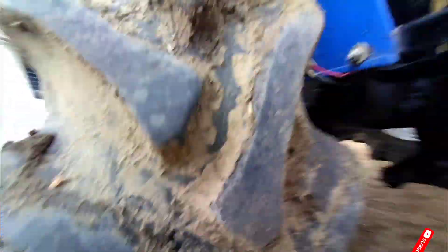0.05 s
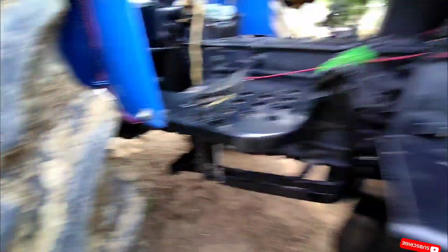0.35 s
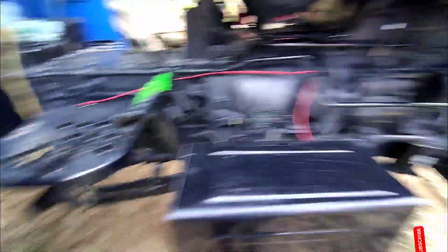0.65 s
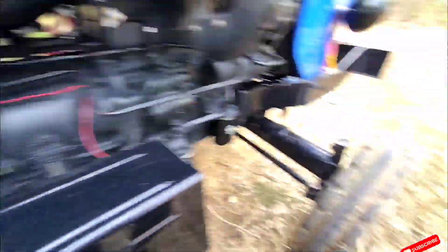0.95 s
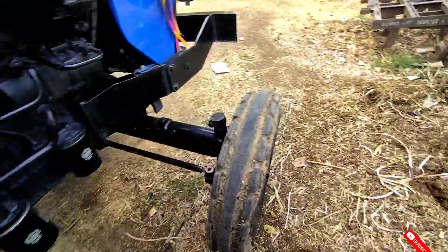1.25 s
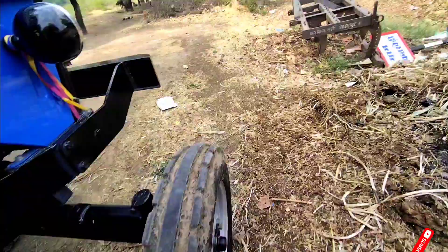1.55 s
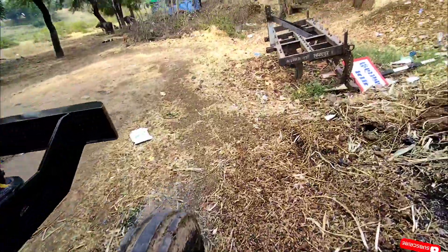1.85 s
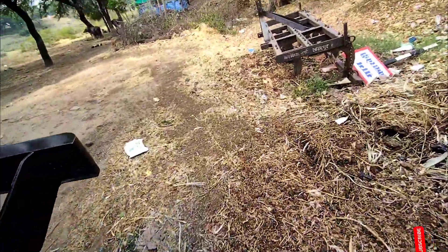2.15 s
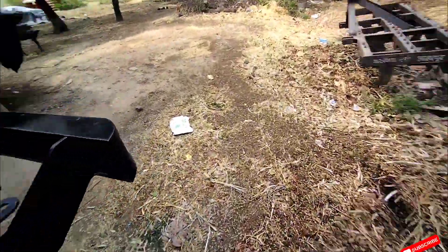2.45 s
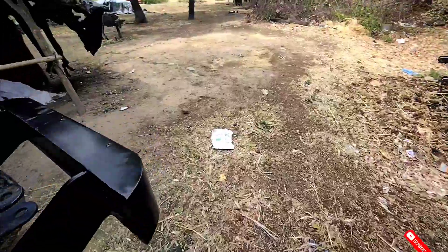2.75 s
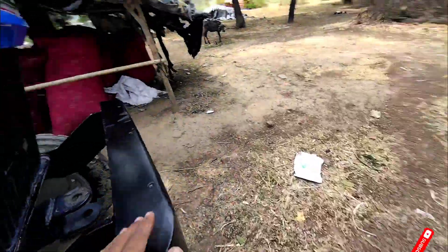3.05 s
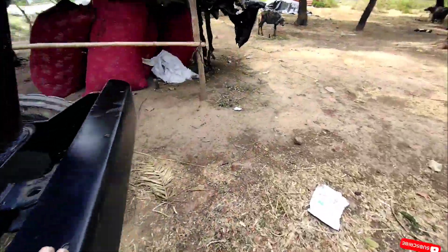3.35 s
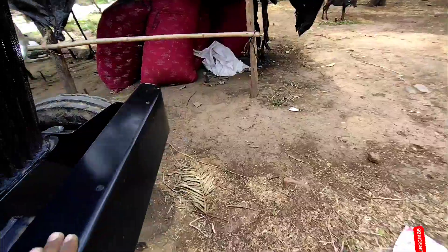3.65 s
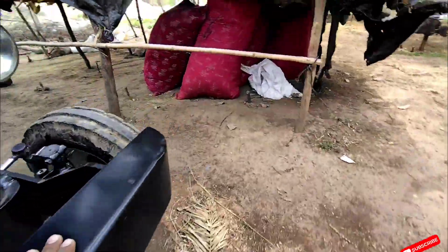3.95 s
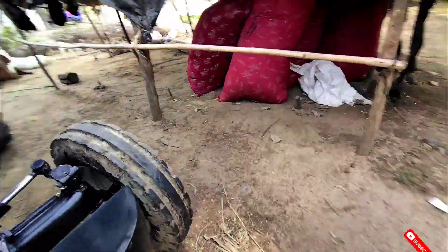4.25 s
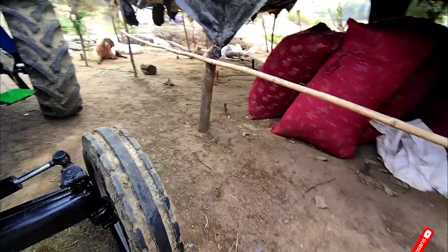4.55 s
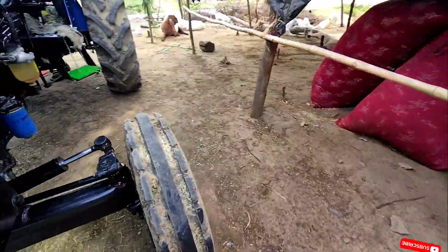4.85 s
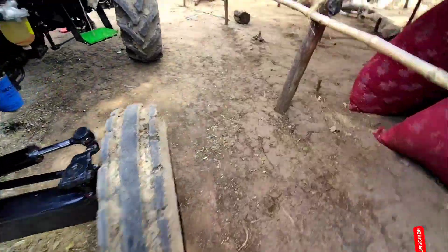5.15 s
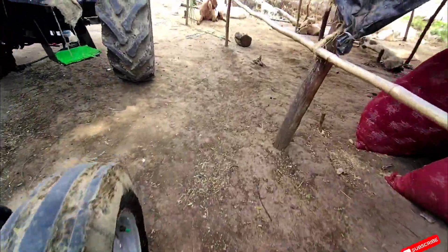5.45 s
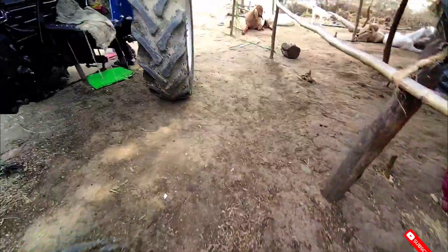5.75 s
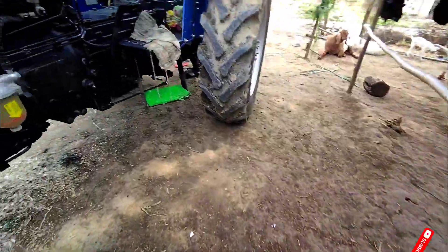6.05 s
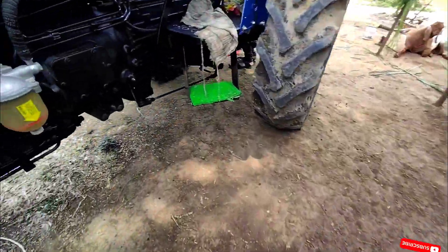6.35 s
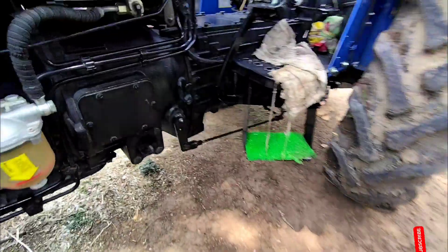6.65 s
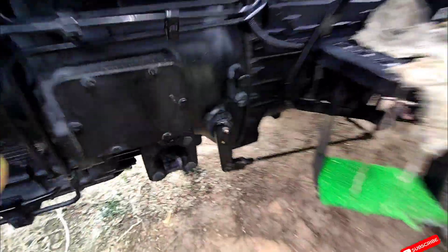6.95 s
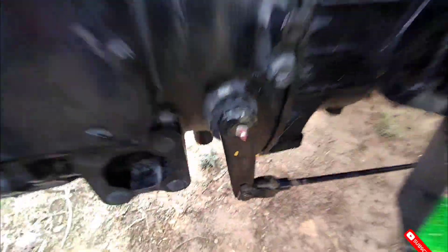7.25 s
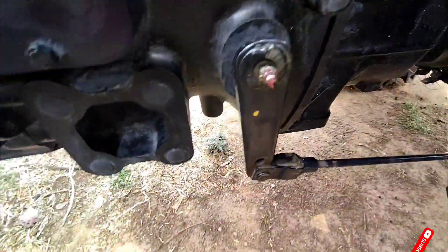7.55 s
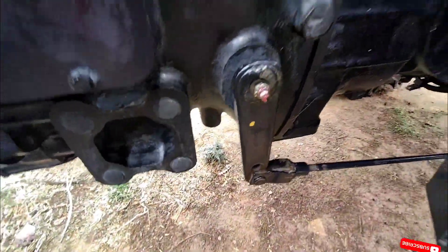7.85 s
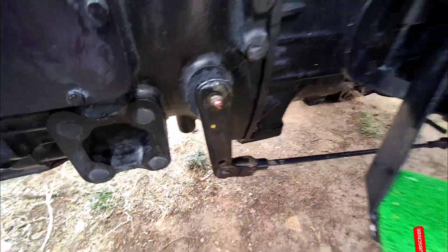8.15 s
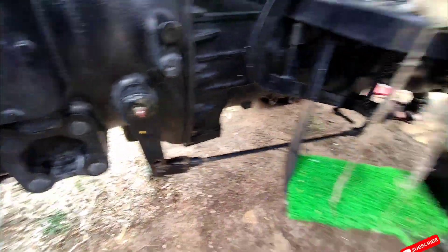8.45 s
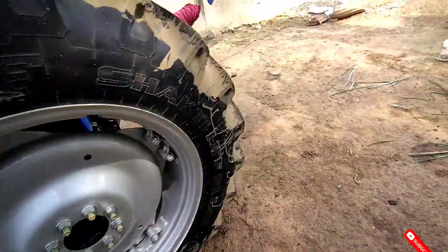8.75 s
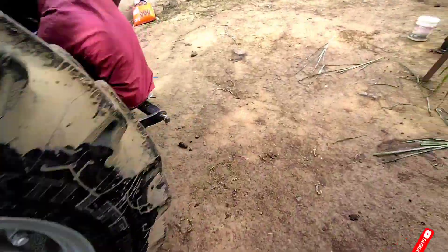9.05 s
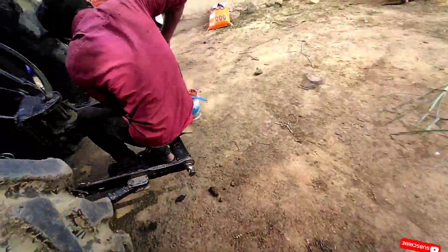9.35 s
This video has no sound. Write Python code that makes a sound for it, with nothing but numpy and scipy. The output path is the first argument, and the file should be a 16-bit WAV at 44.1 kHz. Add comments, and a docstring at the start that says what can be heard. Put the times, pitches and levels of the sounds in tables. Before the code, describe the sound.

A hand-lever grease gun clacks under a tractor, speeding up and growing louder, then pausing before four more strokes, over faint outdoor rumble.

```python
"""In a farmyard, a hand-lever grease gun is pumped under a tractor: slowly, then about five strokes a
second, then four more after a pause. Each stroke scrapes, clacks against its stop, rings the lever and
spring, and sets the chassis booming; the loose linkage rattles in between. The listener walks round the
tractor and ever closer, over a faint outdoor rumble and hum, a few birds, scuffs, bumps and ticks."""
import sys
import numpy as np
from scipy import signal
from scipy.fft import rfft, irfft
from scipy.io import wavfile
from scipy.ndimage import uniform_filter1d

SR = 44100
rng = np.random.default_rng(int(sys.argv[2]) if len(sys.argv) > 2 else 0)


def int16_out(signal):
    """Quantize to a 16-bit WAV file."""
    q = np.round(np.clip(np.atleast_2d(signal).T, -1, 1) * 32767)
    wavfile.write(sys.argv[1], SR, q.astype(np.int16))


N = 415414
SIZE, LEAD = 24576, 4096  # samples in one blow, and how many come before it lands
T = (np.arange(SIZE) - LEAD) / SR  # seconds from the landing
AFTER = np.maximum(T, 0)
HZ = np.fft.rfftfreq(SIZE, 1 / SR)

# Lever strokes; a harder hit has more treble: start_s, level_db, hardness_db
LEVER_STROKES = [(0.2567, -35.5, 7), (0.68, -36, -0.5), (1.121, -34, 7), (1.5457, -36.5, -4.5),
                 (1.9947, -39, -5), (2.389, -40, -6.5), (2.7643, -39.5, -7), (3.077, -37.5, -1),
                 (3.3566, -38, 2.5), (3.6216, -38.5, 1.5), (3.8805, -38, -3), (4.112, -38, -1),
                 (4.3544, -34, -1), (4.558, -33.5, 4.5), (4.7566, -32.5, 1.5), (4.942, -31, 2.5),
                 (5.1276, -30, 2.5), (5.319, -30, 2), (5.489, -31, 1.5), (5.701, -28.5, 0.5),
                 (5.8779, -28, 1), (6.076, -27, 1), (6.266, -25, 0.5), (6.459, -23.5, -.5),
                 (6.648, -24, -3.5), (6.8424, -21, -1), (7.9036, -22.5, -4), (8.189, -23.5, -0.5),
                 (8.445, -20.5, -1.5), (8.688, -19, -2)]
# The gun as heard along the walk: time_s, left_delay_samples, left_over_right_db, boom_db, knock_db
WALK_PATH = [(0.25, -14, 0, -3, -9.5), (1.12, -12, -1, -7.5, -11), (1.55, -11.5, -.5, -3.5, 2),
             (2.5, -13.5, -1.5, 0.5, -1), (3.2, -16, 0, 4.5, 7.5), (4.1, -15, -1, 9, 4.5),
             (4.5, -15, -0.5, 3, 2.5), (5.6, -13, -1, -1, 0.5), (6.25, -2, -1.5, -2, -7),
             (6.8, 3, -1, -2.5, -5.5), (8.7, 5, -2.5, -7.5, -5)]
# How alike left and right are for close sounds: pitch_hz, likeness (0 to 1)
NEAR_LIKENESS = [(100, 1), (300, 0.8), (700, 0.78), (2000, 0.14), (5000, 0.099), (14000, 0.14)]
# The same for sounds from all around: pitch_hz, likeness (0 to 1)
YARD_LIKENESS = [(40, 0.41), (85, 1), (160, 0.84), (500, 0.7), (1500, 0.068), (12000, 0.079)]


def amp(db):
    """Turns decibels into a gain."""
    return 10 ** (np.asarray(db) / 20)


def read(points, hz):
    """Reads a curve of (pitch, value) points, joined by straight lines on a log pitch scale."""
    pitches, values = np.transpose(points)
    return np.interp(np.log(hz + 1), np.log(pitches + 1), values)


def along(curve, s):
    """Reads each column of a curve at time s."""
    times, *columns = np.transpose(curve)
    return [np.interp(s, times, column) for column in columns]


def add(mix, s, sound):
    """Lays a sound into the mix from time s."""
    part = mix[:, max(round(s * SR), 0):][:, :sound.shape[-1]]
    part += sound[..., :part.shape[1]]


def evened(x):
    """Scales a sound to an average (rms) level of 1."""
    return x / np.sqrt(np.mean(x ** 2) + 1e-20)


def unit_blow(x):
    """Scales a blow to the energy of 30 ms at level 1."""
    return evened(x) * np.sqrt(.03 * SR / SIZE)


def jitter(count, smooth_samples):
    """A quick random wobble, made of smoothed noise."""
    return evened(uniform_filter1d(rng.standard_normal(count), smooth_samples))


def drift(points):
    """A slow random wander through this many points over the whole scene."""
    return np.interp(np.arange(N), np.linspace(0, N - 1, points), rng.standard_normal(points))


def noise_pair(likeness, hz):
    """Spectra of two partly alike white noises, left and right."""
    left, other = np.exp(2j * np.pi * rng.random((2, len(hz))))
    same = np.clip(read(likeness, hz), -1, 1)
    return np.array([left, same * left + np.sqrt(1 - same ** 2) * other])


def causal(db):
    """A filter with these gains that rings only after a blow, never before it."""
    log_gain = db * np.log(10) / 20
    mirrored = np.r_[log_gain, log_gain[-2:0:-1]]
    return np.exp(np.conj(signal.hilbert(mirrored))[:len(db)])


def outdoor_air(trims_db=(2.0, -3.5, -1.0), flutter_db=4.0):
    """Three bands of noise, each gently uneven: muffled rumble, open air and fine hiss."""
    # Band levels before their trims: time_s, rumble_db, air_db, hiss_db
    band_levels = [(0.3, -60, -50, -56), (2.1, -63, -56.5, -64), (3.8, -63, -53, -56.5),
                   (4.8, -64, -49.5, -56.5), (5.7, -58, -56, -58.5), (6.4, -56.5, -53, -73),
                   (7.1, -57.5, -49.5, -65.5), (7.72, -56, -56, -71), (8.7, -50, -46, -74.5)]
    # Tone colour of the air: pitch_hz, level_db
    air_colour = [(15, -60.5), (25, -21.5), (170, 1), (242, -8), (354, -10), (439, -11), (503, -13.5),
                  (659, -15.5), (887, -16), (962, -18.5), (2480, -17), (3340, -21), (4370, -21.5),
                  (7510, -29), (16000, -23)]
    hz, t = np.fft.rfftfreq(N, 1 / SR), np.arange(N) / SR
    noise = noise_pair(YARD_LIKENESS, hz) * amp(read(air_colour, hz))
    low, high = read([(350, 0.63), (550, 0)], hz), read([(5000, 0.059), (7000, 0.88)], hz)
    out = np.zeros((2, N))
    for band, level, trim in zip([low, 1 - low - high, high], along(band_levels, t), trims_db):
        out += evened(irfft(noise * band, N)) * amp(level + trim + flutter_db * drift(300))
    return out


def hum(waver=0.16):
    """Faint steady tones that waver in level."""
    # Tones of the hum: pitch_hz, level_db
    tones = [(177.6, -76), (586.8, -71), (656.8, -71)]
    t = np.arange(N) / SR
    out = np.zeros(N)
    for hz, db in tones:
        tone = np.sqrt(2) * np.sin(2 * np.pi * (hz * t + rng.random()))
        out += amp(db) * tone * (1 + waver * drift(40))
    return out


def birds(wobble=0.034):
    """Distant birds whistle short, unsteady notes that slide up or down."""
    # Bird notes: start_s, length_s, start_hz, end_hz, level_db
    notes = [(2.104, 0.078, 3000, 3700, -60), (3.286, 0.053, 2700, 3320, -54),
             (4.226, 0.06, 2750, 3350, -53.5), (5.004, 0.072, 4700, 4220, -45),
             (5.057, 0.039, 3780, 4240, -44), (7.597, 0.11, 1190, 1156, -53.5)]
    out = np.zeros((2, N))
    for s, length, start_hz, end_hz, db in notes:
        count = int(length * SR)
        pitch = np.linspace(start_hz, end_hz, count) * (1 + wobble * jitter(count, 60))
        add(out, s, amp(db) * np.hanning(count) * np.sin(2 * np.pi * np.cumsum(pitch) / SR))
    return out


def scuffs(grit=0.31):
    """Short rubs: grainy noise swells and fades."""
    # Scuffs: peak_s, level_db, half_length_s, treble_db
    rubs = [(0.197, -41.5, 0.046, 10), (0.938, -53, 0.037, 8), (2.311, -54, 0.051, 0),
            (2.698, -53, .04, -16), (4.29, -50, 0.028, 6), (5.859, -41, .009, 10), (6.191, -45, 0.0081, 6),
            (6.79, -38.5, 0.0085, 3.5), (7.33, -54, 0.28, -4), (7.538, -40.5, 0.051, -9.5)]
    out = np.zeros((2, N))
    for s, db, half, treble in rubs:
        colour = read([(200, -22), (900, -5.5), (1500, 2), (3000, 0),
                       (6000, treble - 11), (15000, treble - 17)], HZ)
        grains = np.exp(grit * jitter(SIZE, 80))
        rub = evened(irfft(noise_pair(YARD_LIKENESS, HZ) * amp(colour)) * grains)
        swell = np.exp(-(T / half) ** 2) * signal.windows.tukey(SIZE, .1)
        add(out, s + T[0], amp(db) * swell * rub)
    return out


def bumps():
    """Dull bumps, each a few cycles of a low tone."""
    # Bumps: peak_s, pitch_hz, level_db, half_length_s
    thuds = [(0.233, 103, -27, 0.01), (1.975, 403, -33, 0.0045), (2.719, 410, -30.5, 0.0028),
             (1.904, 470, -38, 0.0066), (2.65, 490, -41.5, 0.012), (7.332, 233, -38, 0.0042)]
    out = np.zeros((2, N))
    for s, hz, db, half in thuds:
        add(out, s + T[0], amp(db) * np.exp(-(T / half) ** 2) * np.sin(2 * np.pi * hz * T))
    return out


def ticks(fall_s=0.0016):
    """Tiny bright snaps of noise close by, with no ring."""
    # Dry ticks: start_s, level_db
    snaps = [(2.539, -38), (2.672, -37), (2.841, -34.5), (2.907, -38.5)]
    colour = read([(300, -17), (1500, 12.5), (6000, -8), (13000, 4.5)], HZ)
    out = np.zeros((2, N))
    for s, db in snaps:
        fizz = evened(irfft(noise_pair(NEAR_LIKENESS, HZ) * amp(colour)))
        add(out, s + T[0], amp(db) * fizz * (T > 0) * np.exp(-AFTER / fall_s))
    return out


def yard_tail(level_db, rise_s=0.0045):
    """The yard's reflections blur into noise that dies away after a blow."""
    # How long each band takes to fade by 60 dB: pitch_hz, fade_s
    yard_fades = [(150, 0.77), (600, 0.49), (1500, 0.22), (3500, .25), (12000, 0.34)]
    centres, fades = np.transpose(yard_fades)
    noise = noise_pair(YARD_LIKENESS, HZ)
    tail = np.zeros((2, SIZE))
    for share, fade_s in zip(np.eye(len(centres)), fades):
        band = irfft(noise * read(np.c_[centres, share], HZ))
        tail += amp(level_db - 60 * AFTER / fade_s) * band
    return tail * (1 - np.exp(-AFTER / rise_s))


def place(sound, s):
    """The gun reaches left and right with a delay and balance that follow the walk."""
    # Colour difference between the sides: pitch_hz, left_over_right_db
    side_colour = [(100, 2), (500, 0.5), (1200, 0.5), (2500, -4.5), (5000, -3.5), (8000, 0.5), (13000, 4.5)]
    lag, pan_db, _, _ = along(WALK_PATH, s)
    left = amp((pan_db + read(side_colour, HZ)) / 2) * np.exp(-1j * np.pi * HZ * lag / SR)
    return irfft(rfft(sound) * np.array([left, 1 / left]))


def ring(tones, rise_s, detune, spread_db=2.5):
    """Struck metal rings a little differently each time; each tone drops 60 dB in its fade_s."""
    hz, db, fade_s = np.transpose(tones)[:, :, None]
    cycles = hz * (1 + detune * rng.standard_normal(hz.shape)) * AFTER + rng.random(hz.shape)
    db = db + spread_db * rng.standard_normal(hz.shape)
    waves = amp(db - 60 * AFTER / fade_s) * np.sin(2 * np.pi * cycles)
    return waves.sum(0) * (1 - np.exp(-AFTER / rise_s))


def spring():
    """The return spring sings with a few high tones."""
    # Tones of the spring: pitch_hz, level_db, fade_s
    tones = [(3436, 3, 0.34), (2230, -10, 0.45), (2560, -5.5, 0.26), (4830, -13.5, 0.22)]
    return unit_blow(ring(tones, rise_s=0.011, detune=0.0023))


def chassis_boom(swell_gain=0.77, swell_s=0.033, width_s=0.023):
    """The chassis booms, swelling as the sound comes back from under the tractor."""
    # Low tones of the chassis: pitch_hz, level_db, fade_s
    tones = [(154, -28, .25), (176, -9.5, 0.53), (224.7, 1, 0.45), (245.5, 0, 0.27), (290, -14.5, 0.6)]
    swell = 1 + swell_gain * np.exp(-((T - swell_s) / width_s) ** 2)
    return unit_blow(ring(tones, rise_s=0.017, detune=0.02) * swell)


def chassis_knock():
    """The chassis answers a blow at once with a hollow knock."""
    # Middle tones of the chassis: pitch_hz, level_db, fade_s
    tones = [(457.6, -11.5, .17), (574, -3.5, 0.26), (603, -3, 0.36), (641, -1, 0.28), (725, -4.5, 0.2)]
    return unit_blow(ring(tones, rise_s=0.0017, detune=0.0178))


def lever_clang():
    """The steel lever rings briefly."""
    # Tones of the lever: pitch_hz, level_db, fade_s
    tones = [(919.6, -6, .11), (1108, -4.5, 0.076), (1353, 0.5, 0.16), (1709, 2.5, 0.089),
             (2240, -5.5, 0.1), (2605, -1.5, .13), (2823, -0.5, 0.053), (3100, -3.5, 0.043),
             (5246, -3, .08)]
    return unit_blow(ring(tones, rise_s=0.00081, detune=.012, spread_db=4.5))


def clack(gun_noise, colour_db, attack_s, fall_s, scrape_db, tail_db, dip=0, alike=0.27, echo_s=.044):
    """Steel meets steel: a scrape, a burst and an echo of noise, coloured by the gun's barrel."""
    # Resonances of the barrel and lever: pitch_hz, width_hz, lift_db
    resonances = [(466, 7.3, 6), (627, 160, 3), (814, 32, 6), (924, 84, 4), (1142, 27, 4), (1242, 68, 7),
                  (1396, 67, 3.5), (1703, 76, 4.5), (2142, 88, 4), (2510, 170, 5.5), (2830, 160, 3),
                  (3345, 560, 0.5), (3880, 120, 2.5), (4644, 130, 6.5), (5226, 220, 2), (6030, 160, 1),
                  (10000, 720, 1.5), (13050, 810, 5)]
    # Tone colour common to all clacks: pitch_hz, level_db
    base_colour = [(40, -35.5), (95, -18), (165, 0), (260, 0.5), (350, -3), (700, -1.5), (1400, -6.5),
                   (2600, -4), (4000, -10.5), (5800, -12), (7500, -22), (11000, -24), (16000, -29.5)]
    noise = irfft(np.sqrt(alike) * gun_noise + np.sqrt(1 - alike) * noise_pair(NEAR_LIKENESS, HZ))
    chatter = np.exp(0.2 * np.tanh(jitter(SIZE, 70)))
    slips = np.exp(0.57 * jitter(SIZE, 200))
    onset = .5 + .5 * np.tanh(T / attack_s)
    onset *= 1 - dip * np.exp(-AFTER / 0.0015)  # holds back the first instant
    burst = onset * chatter * np.exp(-(np.maximum(T - attack_s, 0) / fall_s) ** 0.86)
    scrape = amp(scrape_db) * slips * np.exp(-abs(T) / 0.021)
    echo = amp(-20) * slips * (T > echo_s) * np.exp(-abs(T - echo_s) / fall_s)
    sound = noise * np.sqrt(burst ** 2 + scrape ** 2 + echo ** 2) + yard_tail(tail_db)
    barrel_db = sum(db / (1 + (2 * (HZ - hz) / width) ** 2) for hz, width, db in resonances)
    sound = unit_blow(irfft(rfft(sound) * causal(read(base_colour, HZ) + barrel_db)))
    return irfft(rfft(sound) * causal(colour_db))


def linkage_rattles(gun_noise, trim_db=-3, take_up_treble_db=-12.5):
    """Slack in the linkage closes with a light clack before each stroke, and now and then between."""
    # How the slack changes over time: time_s, lead_s, level_against_stroke_db
    slack = [(1.1, 0.027, -40), (4.2, 0.039, -12.5), (5.3, 0.043, -13), (6.8, 0.053, -6.5),
             (7.9, .05, -7.5), (8.19, .048, 5), (8.5, 0.042, 0)]
    # Stray rattles: start_s, level_db, treble_db
    strays = [(0.227, -28.5, -9), (0.307, -34.5, -5.5), (0.416, -28, -15.5), (1.589, -30, -9.5),
              (1.865, -33, -16), (1.897, -38.5, -6.5), (2.611, -26, -24), (2.635, -36.5, -9),
              (7.014, -31, -12.5)]
    out, take_ups = np.zeros((2, N)), []
    for s, level, _ in LEVER_STROKES:
        lead_s, share_db = along(slack, s)
        take_ups.append((s - lead_s, level + share_db, take_up_treble_db))
    for s, level, treble in take_ups + strays:
        colour = read([(200, -5), (500, -5), (1800, -6.0), (4000, treble + 5)], HZ)
        sound = clack(gun_noise, colour, attack_s=0.0019, fall_s=0.00858, scrape_db=-19, tail_db=-6.5)
        add(out, s + T[0], place(amp(level + trim_db) * sound, s))
    return out


def contact_ripple(size_db=2.13, spacing_hz=228.5):
    """The point of contact wanders, leaving a fresh ripple in each stroke's tone colour."""
    return size_db * np.interp(HZ / spacing_hz, np.arange(128), rng.standard_normal(128))


def lever_strokes(gun_noise, usual_db=-30, clean_hardness_db=3.5):
    """The lever hits its stop; the blow travels down into the chassis and stirs the spring."""
    # Strokes that catch the spring and make it sing: start_s, level_db
    pings = [(4.112, -50.5), (4.7565, -43), (4.941, -42), (6.076, -40), (6.266, -44.5)]
    out = np.zeros((2, N))
    for s, level, hardness in LEVER_STROKES:
        _, _, boom_share, knock_share = along(WALK_PATH, s)
        boom, knock = level + boom_share, level + knock_share  # low and middle levels, dB
        bite, fizz = level + hardness, level + 1.06 * hardness  # high and very high levels, dB
        colour = read([(250, boom + 5), (390, (level + knock) / 2 + 2), (600, knock + 4),
                       (950, level + 3), (1700, level + 3), (2400, bite + 3), (3200, bite + 3),
                       (5000, (bite + fizz) / 2 + 2), (8000, fizz + 3.5)], HZ)
        # Heavier strokes land more slowly, harder ones faster; both die away sooner.
        heaviness = level - usual_db
        attack_s = .0019 * amp(.5 * heaviness - hardness)
        fall_s = 0.01456 * amp(-0.2 * heaviness - .4 * hardness)
        # The hardest strokes land clean, almost without a scrape.
        scrape_db = -17.5 - 0.16 * hardness - 12.5 * max(hardness - clean_hardness_db, 0)
        sound = clack(gun_noise, colour + contact_ripple(), attack_s, fall_s, scrape_db,
                      tail_db=-12, dip=0.14 * max(hardness, 0))
        sound += amp(boom - 2) * chassis_boom()
        sound += amp(knock - 4) * chassis_knock()
        sound += amp((level + bite) / 2 - 5) * lever_clang()
        sound += amp(level - 22.5) * spring()
        add(out, s + T[0], place(sound, s))
    for s, level in pings:
        add(out, s + T[0], place(amp(level) * spring(), s))
    return out


def scene():
    """The grease gun over the sounds of the yard; all its clacks share some of the same noise."""
    gun_noise = noise_pair(NEAR_LIKENESS, HZ)
    gun = lever_strokes(gun_noise) + linkage_rattles(gun_noise)
    return gun + ticks() + bumps() + scuffs() + birds() + outdoor_air() + hum()


def record(dry, end_s=8.712, cutoff_hz=16200):
    """Stops the sound abruptly and takes off the very highest treble."""
    stop = np.exp(-np.maximum(np.arange(N) / SR - end_s, 0) / .003)
    low_pass = signal.firwin(511, cutoff_hz, window=("kaiser", 9), fs=SR)
    return signal.oaconvolve(dry * stop, low_pass[None], "same")


dry = scene()
out = record(dry)
int16_out(out)
```